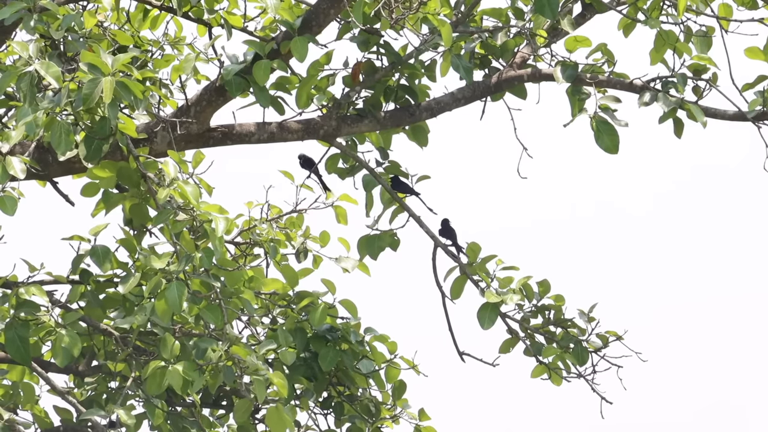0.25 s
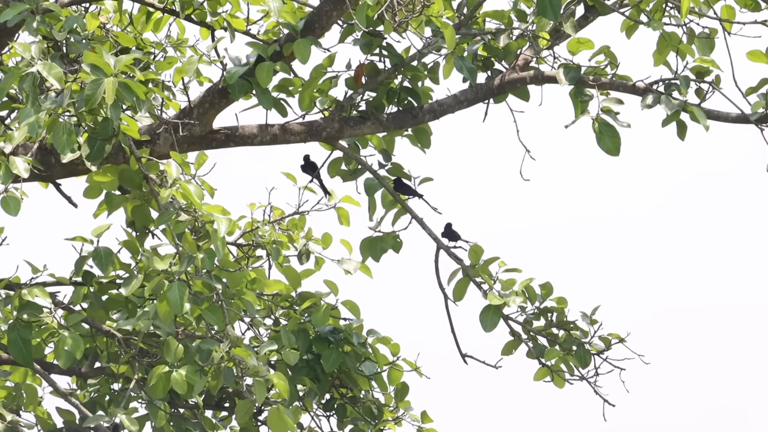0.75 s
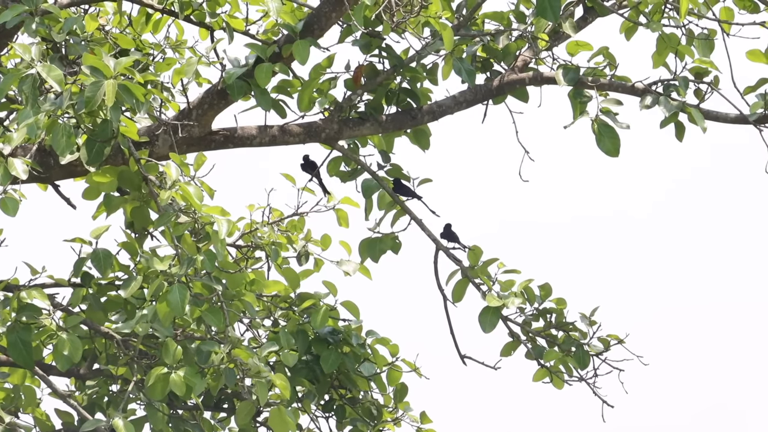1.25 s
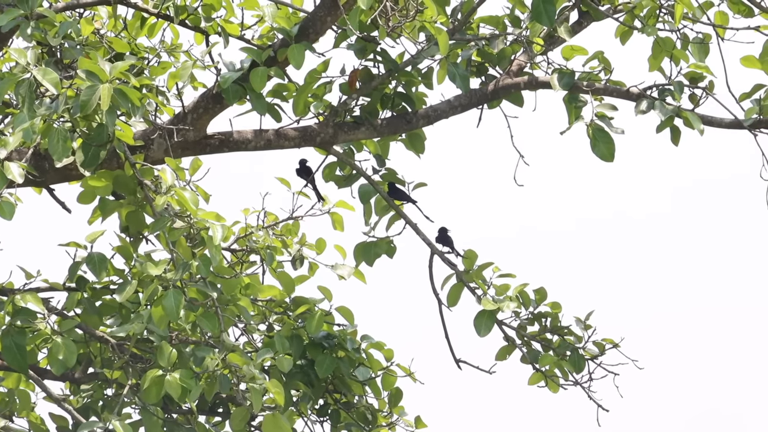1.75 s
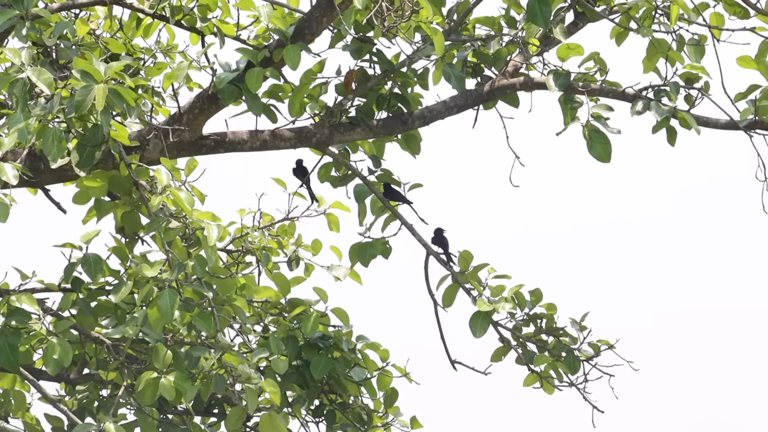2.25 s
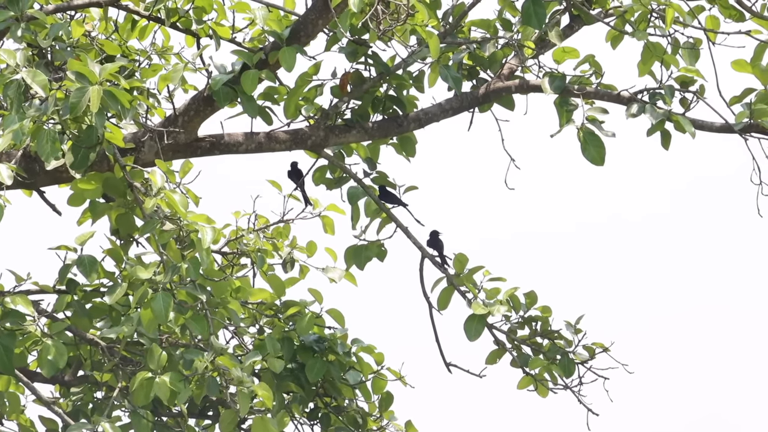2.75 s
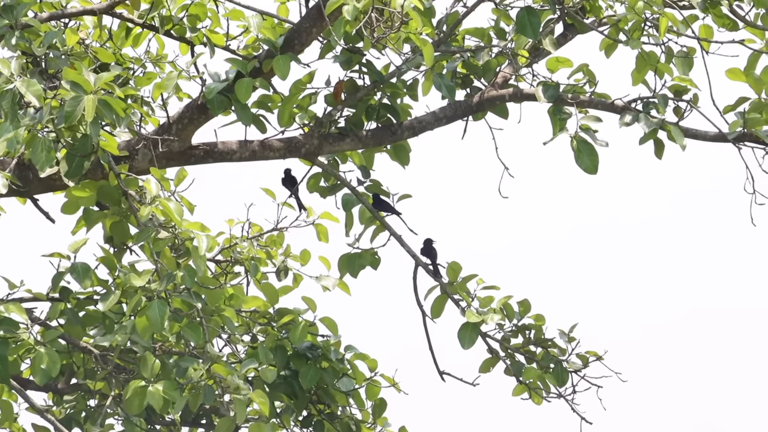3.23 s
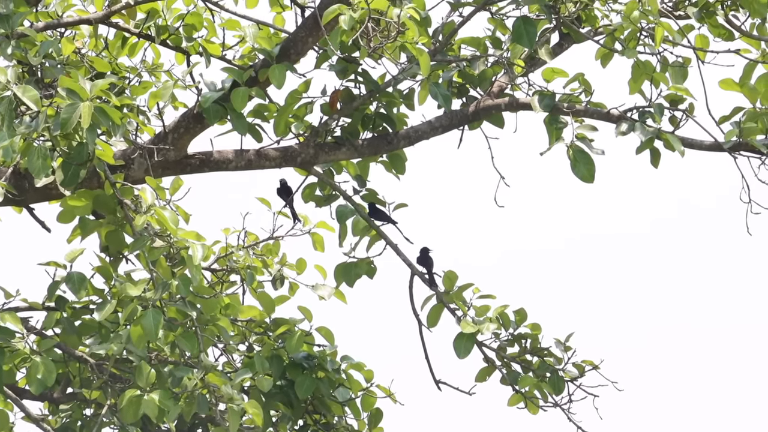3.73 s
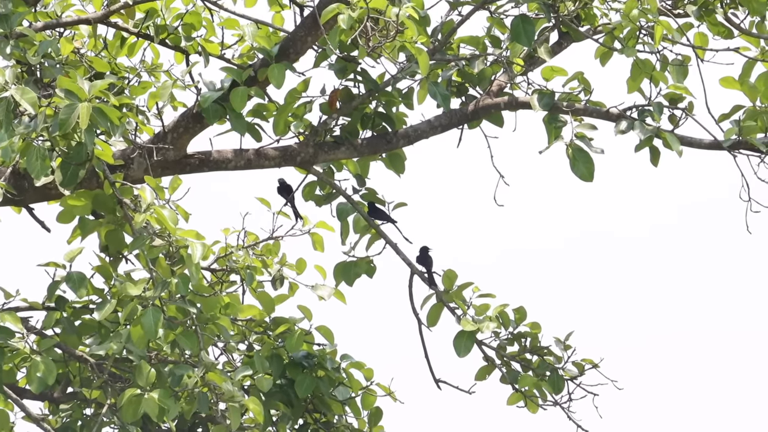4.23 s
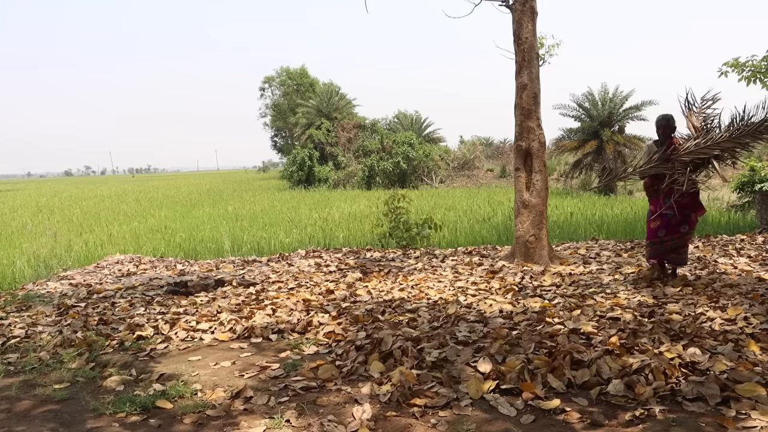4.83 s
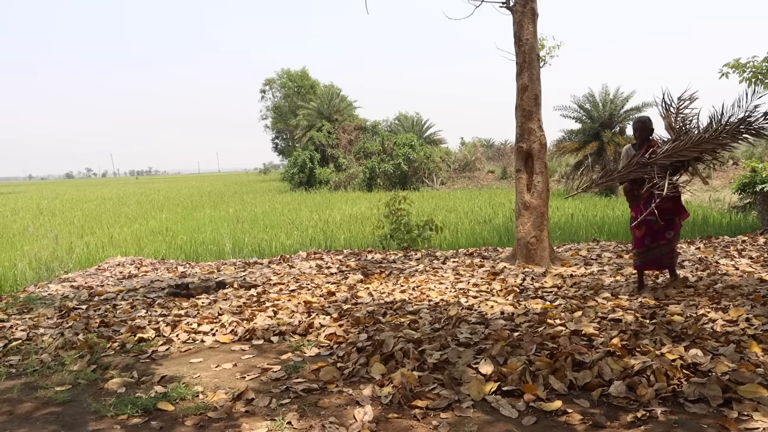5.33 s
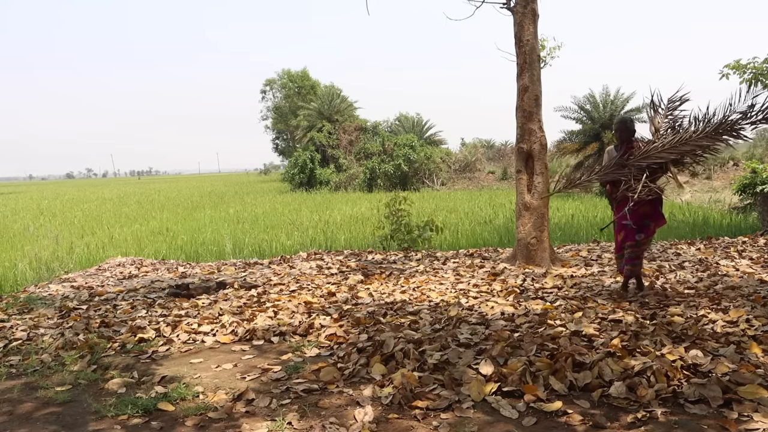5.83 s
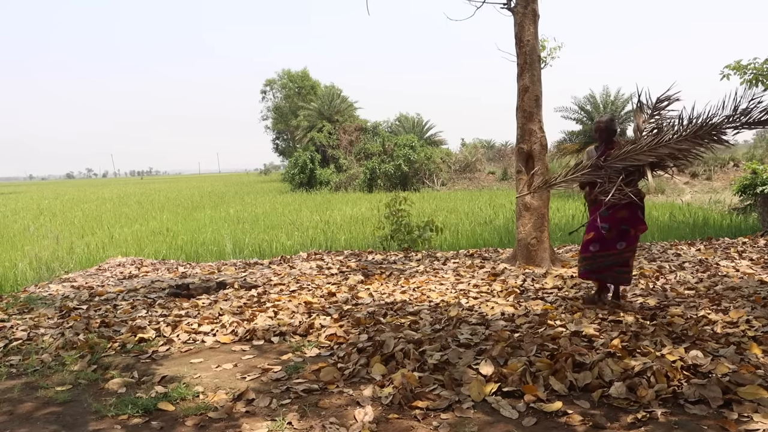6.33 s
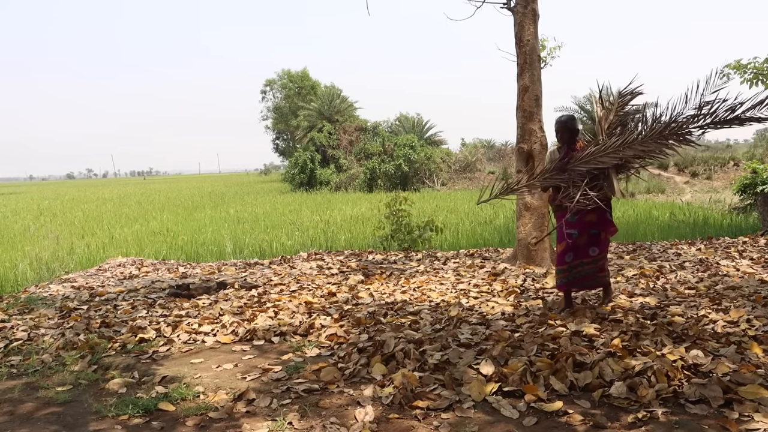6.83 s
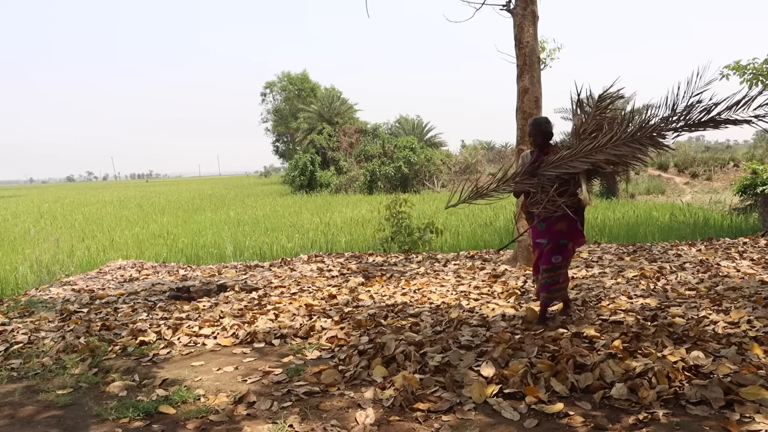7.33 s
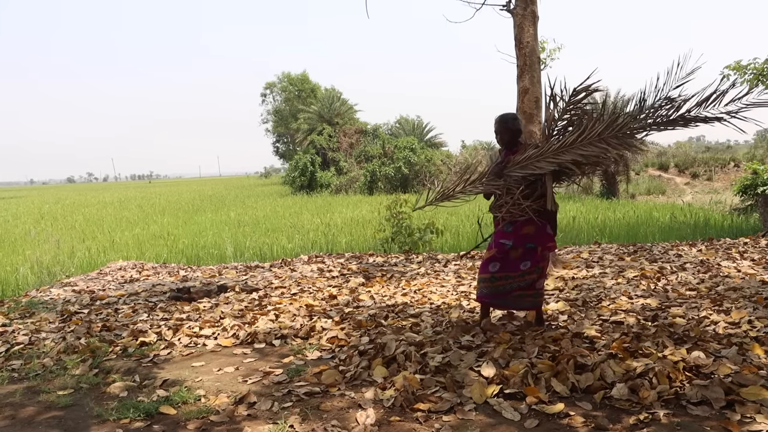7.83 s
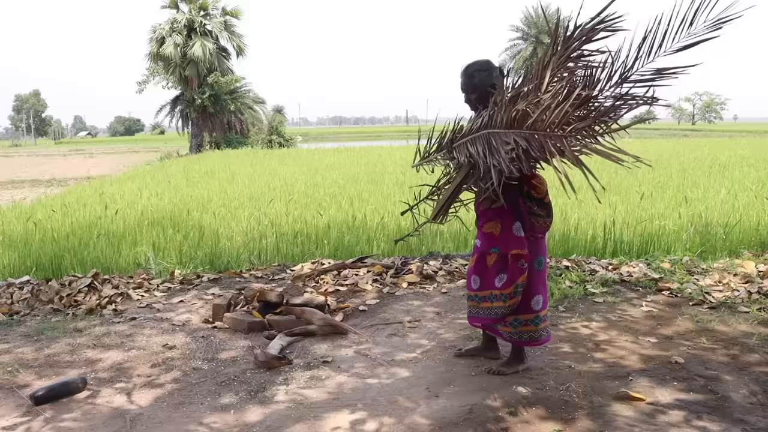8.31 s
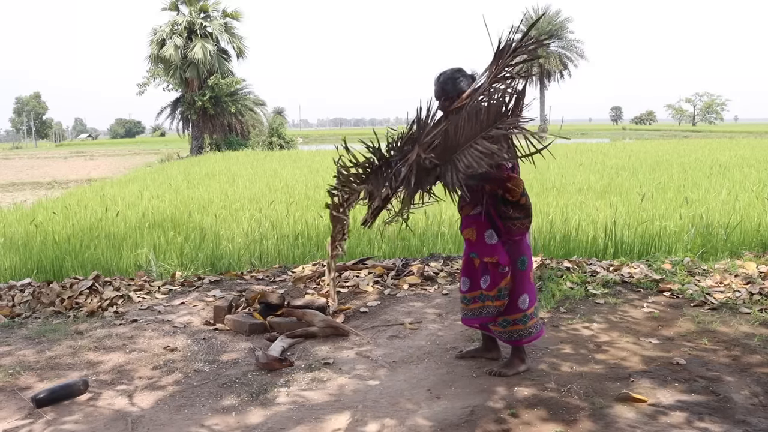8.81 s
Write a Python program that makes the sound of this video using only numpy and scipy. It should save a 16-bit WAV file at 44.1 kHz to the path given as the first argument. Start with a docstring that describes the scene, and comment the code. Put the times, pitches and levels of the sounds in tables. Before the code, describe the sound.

Short, harsh bird calls come from a tree over a faint outdoor rumble, turning from scolding rasps to squawky screeches and hisses. Then the sound switches abruptly to a bundle of dry palm fronds being carried through leaf litter: uneven swells of rustling, crunching steps, sharp snaps and a few woody knocks. Low wind bumps hit the microphone, most of them near the end.

```python
"""Drongos, then dry palm fronds

Quiet open country: drongos scold from a tree with harsh rasps, voiced squawks and a few thin chips. Then the
scene changes: someone carries a bundle of dry palm fronds over fallen leaves, from the right towards the
middle. Leaves crush, leaflets rub, crackle and snap, stalks knock, and puffs of wind bump the microphone. The
scene changes once more, cutting the rustle off, and at last the bundle is lowered."""
import sys
import numpy as np
from scipy import signal
from scipy.fft import rfft, irfft, next_fast_len
from scipy.io import wavfile
from scipy.ndimage import map_coordinates

SR = 44100
rng = np.random.default_rng(int(sys.argv[2]) if len(sys.argv) > 2 else 0)


def output_pcm(signal):
    """Save a mono or channel-first signal as 16-bit PCM at the path in sys.argv[1].

    Samples are clipped to [-1, 1] before scaling.
    """
    pcm = np.clip(np.atleast_2d(signal).T, -1, 1) * 32767
    wavfile.write(sys.argv[1], SR, np.round(pcm).astype(np.int16))


N = 399987
TIME = np.arange(N) / SR
CHANGE_S, SECOND_CUT_S = 4.55, 8.352   # the walk begins; the scene cuts again

# Colour of distant air and of breeze on the microphone. Each row: frequency in Hz, relative level in dB.
AIR_COLOUR = [(15, -46), (27, -11.5), (112, -0.5), (196, -6), (438, -10.5), (501, -14), (604, -14),
              (1630, -20), (2240, -15.5), (3930, -21.5), (5010, -23), (6040, -22.5), (7280, -28.5),
              (8320, -28.5), (15000, -35)]
BREEZE_COLOUR = [(20, -8), (60, 4), (130, -7.5), (300, -21.5), (700, -3)]
# How alike the two microphones hear air and foliage. Each row: frequency in Hz, correlation.
AIR_LIKENESS = [(60, 1), (290, 0.79), (640, 0.066), (3000, 0.019), (12000, 0.049)]
FOLIAGE_LIKENESS = [(300, 1), (900, 0.6), (1700, 0.41), (3000, 0.22), (7000, 0.31), (13000, 0.091)]
# Eddies right at the microphone.
# Each row: start in seconds, relative level in dB, pitch in Hz, left minus right in dB.
WIND_BUMPS = [(4.579, -31, 99, 21), (5.514, -34, 113, -11), (5.902, -35.5, 97, 18), (6.038, -38, 93.5, 15),
              (6.817, -43, 78, 17), (7.167, -30, 70.5, 16), (7.319, -34, 108, 42), (8.432, -20.5, 98, -15),
              (8.469, -26, 87, 17), (8.567, -34, 95, 19), (8.6, -36.5, 133, 22), (8.698, -27, 158, 23),
              (8.721, -25.5, 77.5, 18), (8.76, -30.5, 79, 17), (8.819, -28.5, 92, 18),
              (8.844, -29, 112, 14.0)]
# Where the birds and the bundle are, seen from the microphones.
# Each row: time in seconds, lag of the left channel in samples, left minus right in dB.
BIRD_PATH = [(1.5, -6, 2.5), (1.8, 0, 0)]
BUNDLE_PATH = [(4.6, 5.6, -3), (6.4, 5.04, -3.5), (7.3, 4.16, -2), (8.2, 2.24, -2), (9.0, 1.6, -1.5)]

# Thin chips and soft notes from the tree.
# Each row: start and length in seconds, first and last pitch in Hz, level in dB.
CHIPS = [(0.226, 0.0032, 8100, 6200, -42.5), (0.236, 0.01, 5850, 3860, -37.5),
         (0.729, 0.036, 5620, 5440, -48), (0.94, 0.023, 6340, 5200, -51), (1.348, .14, 1314, 1220, -56.5),
         (1.722, 0.12, 3660, 3420, -60), (1.81, 0.097, 2070, 2140, -58), (1.878, 0.033, 6300, 5630, -53),
         (3.47, 0.096, 1664, 1640, -57)]
# Voiced squawks. Each row: start and length in seconds, first, held and last pitch in Hz, level in dB.
SQUAWKS = [(.735, .085, 1330, 1460, 1350, -55), (1.41, .08, 1800, 1680, 1580, -53),
           (1.915, .235, 900, 1590, 1100, -45), (2.17, .09, 1400, 1470, 1290, -51),
           (2.535, .095, 1530, 1560, 980, -42), (2.708, .12, 2170, 2250, 2050, -60),
           (3.175, .07, 1360, 1362, 1350, -37.5), (3.27, .07, 1400, 1490, 1380, -41),
           (3.475, .085, 1380, 1362, 1360, -39.5)]
# Relative levels of a squawk's harmonics in dB, from the fundamental up.
SQUAWK_HARMONICS_DB = [-10, 5, 2.5, -10, -13]
# Throat colour of the three kinds of rasp. Each row: frequency in Hz, relative level in dB.
SCOLD_THROAT = [(700, -30), (994, -20), (1360, -15.5), (2010, -18.5), (2780, -7), (3700, -2), (4260, -3),
                (4760, -10), (5540, -13), (8480, -14), (9140, -16.5), (10600, -12), (12700, -36),
                (14000, -38)]
SCREECH_THROAT = [(700, -28), (1620, -10), (2400, -9), (2750, -1), (3310, -4.5), (4150, 0), (5400, -8),
                  (6360, -4), (7480, -19.5), (9030, -7.5), (10900, -22), (13000, -21), (14000, -53)]
HISS_THROAT = [(700, -29), (866, -27.5), (1480, -20.5), (1950, -13), (2330, -9.5), (2780, -2), (3400, -7),
               (4700, 0), (5270, -13), (6120, -1), (7200, -14.5), (10200, -14), (14000, -31)]
# Harsh calls. Each row: start and length in seconds, relative level in dB, slide of the resonances as
# a share of their pitch (positive sinks), piercing resonance in Hz, its share in dB, then the low
# range and the treble in dB against the middle range.
RASPS = [(0.047, 0.15, -55, 0.038, 4460, -5, -15, -10), (0.358, 0.15, -36, 0.0036, 3070, -8, -14, -12.5),
         (0.529, 0.06, -48, 0.047, 2310, -5, -6, -13), (0.721, 0.099, -49, -0.0079, 4250, -3, -11, -10),
         (0.96, 0.27, -40.5, 0.1, 3710, -17, -14, -15.5), (1.296, 0.17, -43, 0.012, 3370, -9, -12, -13),
         (1.895, 0.1, -33, 0.022, 3860, -0.5, -14.5, -13.5),
         (2.007, 0.13, -39, 0.025, 3460, -7, -17.5, -14), (2.166, .15, -49, -0.0083, 3830, -12, -13, -13),
         (2.527, 0.056, -37, -0.019, 4020, 1, -13, -15), (2.561, 0.065, -31, 0.019, 3830, -11, -18, -16.5),
         (2.695, 0.032, -45, 0.027, 4460, -2, -12, -14),
         (3.008, 0.16, -36.5, 0.0081, 3850, -15, -15, -16.5), (3.143, 0.14, -30, -0.03, 3340, -12, -13, -6),
         (3.241, 0.1, -31.5, 0.06, 3850, -13, -11.5, -7.5),
         (3.438, 0.153, -32.5, -0.024, 4200, -15, -15, -4.5), (3.54, 0.095, -30, 0.03, 4740, -12, -13, -7),
         (3.722, 0.19, -48, 0.031, 5540, -14, -10, -12), (3.861, 0.045, -34, 0.02, 4940, 0, -5, -3.5),
         (3.902, 0.21, -38, -0.026, 4130, -12, -6, -5.5), (4.125, 0.06, -34, -0.0044, 4750, -6.5, -6, -6.5),
         (4.247, 0.23, -37.5, -0.002, 4680, -4.5, -6, -6.5)]
# Rising buzzes that end two loud rasps.
# Each row: start and length in seconds, first and last rate in pulses per second.
BUZZES = [(3.244, .09, 260, 600), (3.549, .09, 230, 600)]

# Colour of dry leaves on the ground and of the fronds. Each row: frequency in Hz, relative level in dB.
LEAF_COLOUR = [(76, -29), (130, -9.5), (211, -6), (365, 1.5), (460, -3.5), (531, -8.5), (731, 0),
               (852, 2.5), (1220, -3), (1580, 3.5), (1800, -3), (2340, -60)]
FROND_COLOUR = [(530, -43), (900, 1.5), (1220, -5), (1900, 1), (2830, -0.5), (4250, -14), (4680, -12),
                (8450, -18.5), (10900, -14), (14200, -21.5), (14900, -34)]
# Narrow resonances of the camera body that colour the rustle, in Hz.
CAMERA_RINGS_HZ = [743, 833, 1900, 2650]
# Stalks knocking. Each row: start in seconds, level in dB, pitch in Hz, t60 in seconds.
KNOCKS = [(4.9327, -16, 2100, .06), (6.62, -18.5, 2050, .04), (7.2228, -11.5, 1900, .02),
          (7.4008, -13.5, 1900, .018), (8.3473, -20, 2150, .014), (8.811, -22.5, 1750, .05)]
# Leaflets snapping. Each row: start in seconds, relative peak in dB, pitch in Hz,
# share of the splinter tail in dB, share of the bright tick in dB.
SNAPS = [(4.875, 1.5, 2390, -8, 15), (6.024, -14, 6950, -4, -3), (6.0685, -14.5, 1980, -6.5, -20),
         (5.3502, -2, 3840, -8, -20), (6.8321, -11, 2750, -14, -8), (7.188, -6, 1960, -3, 4),
         (7.328, -4.5, 1930, -15, 16), (7.3624, -8.5, 2010, -1, -5), (7.777, -5, 5170, -1, 7),
         (8.4469, -7.5, 6700, -14, 10), (8.537, -22.5, 2760, -2, 6), (8.5552, -10, 3780, -5, 10),
         (8.618, -4.5, 9050, -8, -24), (9.0177, -10.5, 3000, -9, -5)]
# The bundle swaying. Each row: start, rise and t60 in seconds, level in dB,
# then crushed leaves and crackle in dB against the rubbing.
SWISHES = [(4.63, 0.32, 0.98, -23.5, -9.5, 1), (4.96, 0.085, 0.61, -28, -11.5, 2),
           (5.59, 0.11, 0.42, -30.5, -7.5, 2), (5.72, 0.065, 0.34, -29.5, -10, 4.5),
           (6.16, 0.19, 0.62, -29.5, -10, 5), (6.4, 0.16, 0.96, -26, -11.5, -1.5),
           (6.63, 0.1, 0.45, -27.5, -12, 6.5), (6.83, 0.1, 0.32, -35.5, -2, 6.5),
           (7.05, 0.17, 1.28, -25, -8.5, 2.5), (7.29, 0.11, 2.04, -29, -6.5, 5),
           (7.69, 0.24, 1.2, -27, -3, -3), (7.84, 0.042, 0.5, -24, -6, 0), (8.04, 0.27, 1.6, -35, -4, -1.5),
           (8.79, 0.31, .6, -29, -8.5, 6)]
# Sudden crunches. Each row: start and t60 in seconds, level in dB, crackle in dB against the rubbing.
CRUNCHES = [(4.548, 0.81, -42.5, 3.5), (4.76, 0.37, -34, -14), (5.168, 1.5, -32, 3),
            (5.399, 0.73, -33.5, 3), (5.532, 0.97, -38, -1), (6.03, 0.4, -37, 3), (6.179, 3.4, -37, -0.5),
            (6.453, 0.76, -29, 1), (7.03, 1.2, -30, -0.5), (7.178, 0.27, -28, 10), (7.36, 0.18, -31.5, 6),
            (7.668, 3, -31, 3), (8.017, 0.86, -32.5, 4), (8.442, 0.15, -35.5, 11), (8.551, 0.46, -37.5, 7),
            (8.612, 0.39, -32.5, 8), (8.758, 1.24, -36, 2.5)]
# Feet pressing through leaf litter. Each row: start in seconds, level in dB.
FOOTFALLS = [(6.349, -34), (6.455, -36.5), (7.72, -35.5), (7.945, -32.5)]


def from_db(db):
    """Decibels to gain."""
    return 10 ** (np.asarray(db) / 20)


def unit_rms(x):
    """Scale so that the mean of the channels has rms 1."""
    return x / np.sqrt(np.mean(np.atleast_2d(x).mean(0) ** 2) + 1e-20)


def coloured(x, points, to_gain=from_db):
    """Filter by a table over log frequency."""
    size = next_fast_len(N, True)
    hz, value = np.transpose(points)
    freqs = np.maximum(np.arange(size // 2 + 1) * SR / size, 1)
    gain = to_gain(np.interp(np.log(freqs), np.log(hz), value))
    return irfft(rfft(x, size) * gain, size)[..., :N]


def band(x, low_hz, high_hz, order=4):
    """Causal band-pass."""
    sos = signal.butter(order, [low_hz, min(high_hz, .47 * SR)], "band", fs=SR, output="sos")
    return signal.sosfilt(sos, x)


def drift(rate_hz):
    """Smooth random wandering with rms 1."""
    pole = np.exp(-2 * np.pi * rate_hz / SR)
    return unit_rms(signal.lfilter([1], [1, -2 * pole, pole * pole], rng.standard_normal(N + SR))[SR:])


def add(out, s, sound):
    """Mix a short sound in at s seconds."""
    start = int(s * SR)
    out[..., start:start + sound.shape[-1]] += sound[..., :N - start]


def shares(low_db, top_db):
    """Gains of the low, middle and top ranges; their powers add up to 1."""
    gains = from_db([low_db, np.zeros_like(low_db), top_db])
    return gains / np.sqrt(np.sum(gains ** 2, axis=0))


def pan(side_db):
    """Gains of left and right, side_db apart."""
    return from_db(np.array([[side_db], [-side_db]]).reshape(2, -1) / 2)


def placed(x, path):
    """A source off to one side reaches the far microphone later and weaker."""
    times, lags, sides_db = np.transpose(path)
    left = map_coordinates(x[0], [np.arange(N) - np.interp(TIME, times, lags)], order=3, mode="nearest")
    return np.array([left, x[1]]) * pan(np.interp(TIME, times, sides_db))


def noise_pair(likeness):
    """White noise at two microphones, more alike in the bass."""
    mid = coloured(rng.standard_normal(N), likeness, lambda c: np.sqrt(1 + np.clip(c, -1, 1)))
    side = coloured(rng.standard_normal(N), likeness, lambda c: np.sqrt(1 - np.clip(c, -1, 1)))
    return np.array([mid + side, mid - side])


def open_air(rumble_db=-56.5, hiss_db=-74.0, drone_db=-71.5, breeze_db=-57.5, gust_db=2.0):
    """Far rumble throughout; a faint drone and thin hiss at the tree, a light breeze on the walk."""
    rumble = from_db(rumble_db) * unit_rms(coloured(noise_pair(AIR_LIKENESS), AIR_COLOUR))
    hiss = from_db(hiss_db) * unit_rms(band(rng.standard_normal((2, N)), 9900, 10600, order=2))
    drone = from_db(drone_db) * unit_rms(band(rng.standard_normal(N), 455, 485, order=2))
    gusts = from_db(-gust_db * np.array([drift(7.7), drift(3.3)]))
    airflow = band(coloured(rng.standard_normal((2, N)), BREEZE_COLOUR), 46, 514)
    breeze = from_db(breeze_db) * unit_rms(airflow * gusts) * pan(side_db=6.2)
    return rumble + np.where(TIME < CHANGE_S, hiss + drone, breeze)


def wind_bumps(rise_s=0.0057, gain_db=0.5, wake_db=-7.5, wake_t60=0.17):
    """An eddy hits mainly one microphone: a swing of pressure, then a turbulent wake."""
    out, t = np.zeros((2, N)), TIME[:SR // 3]
    for s, db, hz, side_db in WIND_BUMPS:
        swing = np.sin(2 * np.pi * hz * t) * t / rise_s * np.exp(1 - t / rise_s)
        turbulence = unit_rms(band(rng.standard_normal(len(t)), 70, 182, order=2))
        wake = turbulence * from_db(wake_db - 60 * t / wake_t60)
        add(out, s, from_db(db + gain_db) * (swing + wake) * pan(side_db) / pan(side_db).mean())
    return out


def foliage_echo(x, t60, stir_hz=3):
    """Dense little reflections in the tree, different on each side and changing as the leaves stir."""
    t = TIME[:SR // 4]
    weights = np.array([drift(stir_hz) for _ in range(4)])
    out = 0
    for weight in weights / np.linalg.norm(weights, axis=0):
        tails = rng.standard_normal((2, len(t))) * from_db(-60 * t / t60)
        tails /= np.sqrt(np.sum(tails ** 2) / 2)
        out = out + weight * signal.oaconvolve(np.atleast_2d(x), tails, axes=1)[:, :N]
    return out


def chips(jitter=.028):
    """Tiny gliding chips and soft notes, slightly hoarse from a trembling pitch."""
    out, tremble = np.zeros(N), 1 + jitter * drift(300)
    for s, length, start_hz, end_hz, db in CHIPS:
        start, count = int(s * SR), int(length * SR)
        glide = np.linspace(start_hz, end_hz, count) * tremble[start:start + count]
        add(out, s, from_db(db) * np.hanning(count) * np.sin(2 * np.pi * np.cumsum(glide) / SR))
    return out


def squawks(jitter=.026, waver=.016):
    """Voiced notes, strongest in the second harmonic: the pitch slides in, wavers and drops."""
    out, tremble = np.zeros(N), 1 + jitter * drift(320) + waver * drift(40)
    for s, length, start_hz, held_hz, end_hz, db in SQUAWKS:
        start, count = int(s * SR), int(length * SR)
        progress = np.arange(count) / count
        pitch = held_hz + (start_hz - held_hz) * (1 - progress) ** 4 + (end_hz - held_hz) * progress ** 6
        phase = 2 * np.pi * np.cumsum(pitch * tremble[start:start + count]) / SR
        tone = sum(from_db(level) * np.sin(k * phase) for k, level in enumerate(SQUAWK_HARMONICS_DB, 1))
        add(out, s, from_db(db) * unit_rms(tone) * np.sqrt(np.sin(np.pi * progress)))
    return out


def syrinx(pulses_per_s=300.0, jitter=.018, sway=.12, gate_depth=.25, rasp_share=.1, buzz_share=.75):
    """The voice organ gives uneven pulses and pulsed hiss; in a buzz the pulses take over and speed up."""
    rate = pulses_per_s * (1 + sway * drift(4))
    pulse_share = np.full(N, rasp_share)
    for s, length, start_rate, end_rate in BUZZES:
        inside = (TIME >= s) & (TIME < s + length)
        rate[inside] = np.geomspace(start_rate, end_rate, inside.sum())
        pulse_share[inside] = buzz_share
    cycles = np.cumsum(rate * (1 + jitter * drift(120))) / SR
    pulses = np.diff(np.floor(cycles), prepend=0) * np.sqrt(SR / rate)
    gate = 1 + gate_depth * np.cos(2 * np.pi * cycles)
    hiss = unit_rms(gate * rng.standard_normal(N))
    return np.sqrt(pulse_share) * pulses + np.sqrt(1 - pulse_share) * hiss


def call_force(attack_s=0.022, arch_db=4, release_db_per_s=336, chatter_db=-67, chatter_sway_db=3):
    """Each call starts fast, arches and dies away; farther birds chatter in between."""
    power = from_db(chatter_db + chatter_sway_db * drift(19)) ** 2
    for s, length, db, *_ in RASPS:
        age = TIME - s
        sag_db = arch_db * (2 * np.clip(age / length, 0, 1) - 1) ** 2
        release_db = release_db_per_s * np.clip(age - length, 0, 1)
        power += (np.clip(age / attack_s, 0, 1) * from_db(db - sag_db - release_db)) ** 2
    return np.sqrt(power)


def throat_wander(x, slide_s, waver_s=0.00107):
    """The throat never holds still: a moving time shift slides and wavers all its resonances."""
    shift_s = slide_s + waver_s * drift(5.76)
    return map_coordinates(x, [np.arange(N) + SR * shift_s], order=3, mode="nearest")


def piercing(source, width_hz=90, linger_s=.05):
    """One sharp resonance of the throat, set anew for each call and gone soon after it."""
    out = np.zeros(N)
    for s, length, _, _, hz, *_ in RASPS:
        span = slice(int(s * SR), int((s + length + linger_s) * SR))
        out[span] = unit_rms(signal.lfilter(*signal.iirpeak(hz, hz / width_hz, fs=SR), source[span]))
    return out


def rasps(gain_db=-2.0, scold_until_s=3.13, screech_until_s=3.71):
    """The syrinx sounds through the sliding throat: first scolds, then screeches, then hisses."""
    force, source = call_force(), syrinx()
    rows = np.array(RASPS)
    current_call = np.maximum(np.searchsorted(rows[:, 0], TIME) - 1, 0)
    s, length, _, slide, _, ring_db, low_db, treble_db = rows[current_call].T
    progress = np.clip((TIME - s) / length, 0, 1)
    slide_s = slide * length * progress * (1 - progress)
    throats = SCOLD_THROAT, SCREECH_THROAT, HISS_THROAT
    turns = [TIME < scold_until_s, TIME < screech_until_s, TIME < CHANGE_S]
    voices = [throat_wander(coloured(source, throat), slide_s) for throat in throats]
    call = from_db(ring_db) * throat_wander(piercing(source), slide_s, waver_s=.00015)
    ranges_hz = (820, 2200), (2200, 5500), (5500, 15500)
    for gain, edges in zip(shares(low_db, treble_db), ranges_hz):
        call += gain * np.select(turns, [unit_rms(band(voice, *edges)) for voice in voices])
    return call * force * from_db(gain_db) / np.sqrt(1 + from_db(ring_db) ** 2)


def drongos(early_db=-1.0, late_db=-11.5):
    """All the birds, reaching the microphones through the foliage of their tree."""
    calls = rasps() + squawks() + chips()
    early = from_db(early_db) * foliage_echo(calls, t60=0.068)
    late = from_db(late_db) * foliage_echo(calls, t60=0.27)
    return placed(calls + early + late, BIRD_PATH)


def knocks(band_ratio=1.5):
    """Thick stalks knock together: a short woody burst with little treble."""
    out, t = np.zeros(N), TIME[:SR // 10]
    for s, db, hz, t60 in KNOCKS:
        decay = from_db(-60 * t / t60)
        burst = band(rng.standard_normal(len(t)) * decay, hz / band_ratio, hz * band_ratio, order=2)
        add(out, s, from_db(db) * burst * np.linalg.norm(decay) / np.linalg.norm(burst))
    return placed([out, out], BUNDLE_PATH)


def snaps(crack_t60=0.016, tail_t60=0.21, tick_t60=.0035, band_ratio=1.28,
          break_db=17.0, spill_db=-22.0, gain_db=-3.0):
    """A stiff leaflet gives way: a sharp break, a bright tick, a pitched crack and a tail of splinters."""
    out, t = np.zeros((2, N)), TIME[:SR // 6]
    for s, db, hz, tail_db, tick_db in SNAPS:
        noise = rng.standard_normal(len(t)) + .5 * rng.standard_normal((2, len(t)))
        decay = from_db(-60 * t / crack_t60) + from_db(tail_db - 60 * t / tail_t60)
        burst = noise * decay + from_db(break_db) * (t == 0)
        tick = from_db(spill_db) * burst + noise * from_db(tick_db - 60 * t / tick_t60)
        crack = band(burst, hz / band_ratio, hz * band_ratio, order=1)
        snap = crack + band(tick, 7400, 12000, order=2)
        add(out, s, from_db(db + gain_db) * snap / np.abs(snap).max())
    return placed(out, BUNDLE_PATH)


def fractures(per_s, spread_db, t60):
    """Power of many tiny breaks: random times, a few large among many small, each dying fast."""
    sizes = from_db(spread_db * np.minimum(rng.exponential(1, N), 5))
    breaks = (rng.random(N) < per_s / SR) * sizes ** 2
    power = signal.lfilter([1], [1, -from_db(-120 / (t60 * SR))], breaks + 1e-18)
    return power / power.mean()


def stirring(carry_db=-47.5, rise_curve=1.12, attack_s=0.0066, crunch_leaves_db=-6.5,
             foot_t60=0.11, foot_leaves_db=12, foot_crackle_db=-19):
    """Gains of crushing, rubbing and crackling: swishes, crunches and footfalls swell and die away."""
    crunches = [(s, attack_s, t60, db, crunch_leaves_db, top_db) for s, t60, db, top_db in CRUNCHES]
    footfalls = [(s, attack_s, foot_t60, db, foot_leaves_db, foot_crackle_db) for s, db in FOOTFALLS]
    carried = from_db(carry_db) * shares(low_db=-7, top_db=1.5)   # the fronds are never quite still
    power = np.outer(carried, np.ones(N)) ** 2
    for s, rise, t60, db, leaves_db, crackle_db in [*SWISHES, *crunches, *footfalls]:
        # the scene cuts again and the ongoing rustle stops abruptly
        age = TIME[:int((SECOND_CUT_S - s) * SR)] if s < SECOND_CUT_S else TIME[:SR]
        swell = np.minimum(age / rise, 1) ** rise_curve
        gain = swell * from_db(db - 60 * np.maximum(age - rise, 0) / t60)
        add(power, s, np.outer(shares(leaves_db, crackle_db), gain) ** 2)
    return np.sqrt(power)


def rustle(large_share=0.3, flutter_db=0.16, ring_db=-0.5, ring_q=110):
    """Leaves crush underfoot, leaflets rub, edges and tips crackle; large breaks sound in them all."""
    crush, rub, crackle = stirring()
    noise = noise_pair(FOLIAGE_LIKENESS)
    large = fractures(per_s=800, spread_db=3.0, t60=.022)
    noise = placed(noise * from_db(flutter_db * drift(33.0)), BUNDLE_PATH)

    def grains(small, colour, low_hz, high_hz):
        """Bursts in the colour of the foliage, with a few fixed narrow rings from the camera body."""
        bursts = noise * np.sqrt(large_share * large + (1 - large_share) * small)
        foliage = band(coloured(bursts, colour), low_hz, high_hz)
        rings = sum(signal.lfilter(*signal.iirpeak(hz, ring_q, fs=SR), foliage) for hz in CAMERA_RINGS_HZ)
        return foliage + from_db(ring_db) * rings

    leaves = grains(fractures(per_s=1800, spread_db=1.0, t60=0.049), LEAF_COLOUR, 110, 1136)
    leaflets = grains(fractures(per_s=1800, spread_db=2.7, t60=.012), FROND_COLOUR, 1200, 4000)
    edges = grains(fractures(per_s=3000, spread_db=2.5, t60=.008), FROND_COLOUR, 4000, 8500)
    tips = grains(fractures(per_s=2200, spread_db=3.1, t60=.006), FROND_COLOUR, 8500, 17000)
    tips[0] = coloured(tips[0], [(9000, 1.0), (13000, -7)])   # the far microphone loses the very top
    return crush * unit_rms(leaves) + rub * unit_rms(leaflets) + crackle * unit_rms(edges + tips)


def scene():
    """Open air throughout; first the birds in their tree, then the walk through the leaves."""
    air, birds = open_air(), drongos()
    walk = rustle() + snaps() + knocks() + wind_bumps()
    return air + np.where(TIME < CHANGE_S, birds, walk)


def record(dry, cutoff_hz=15800):
    """The recorder cuts the top steeply."""
    return signal.sosfilt(signal.ellip(10, .1, 80, cutoff_hz, fs=SR, output="sos"), dry)


dry = scene()
out = record(dry)
output_pcm(out)
```